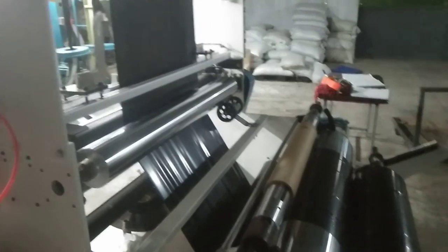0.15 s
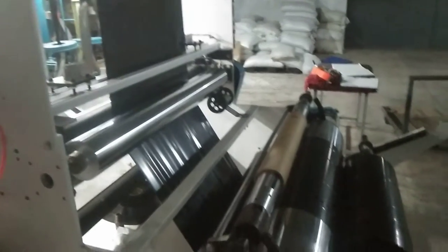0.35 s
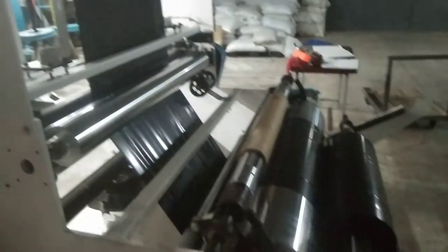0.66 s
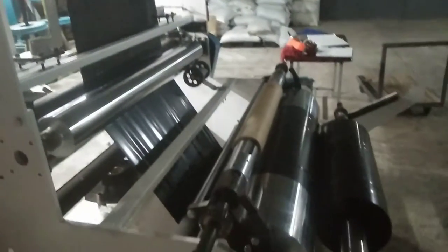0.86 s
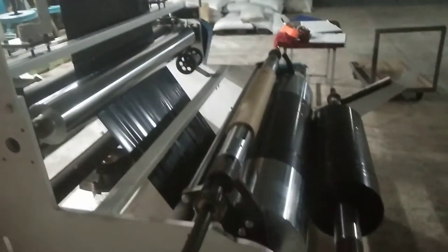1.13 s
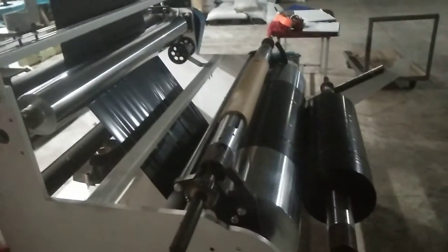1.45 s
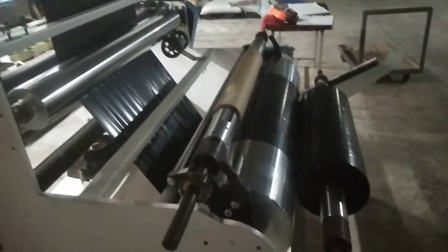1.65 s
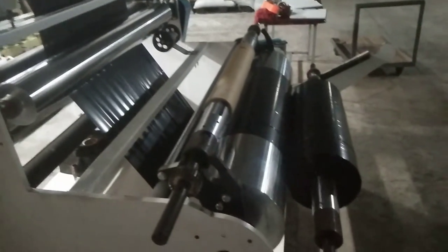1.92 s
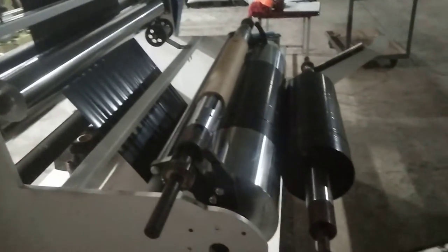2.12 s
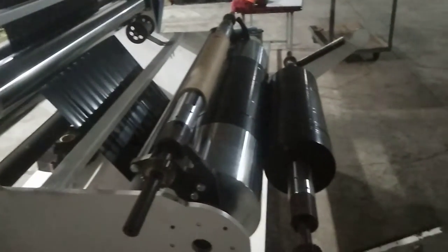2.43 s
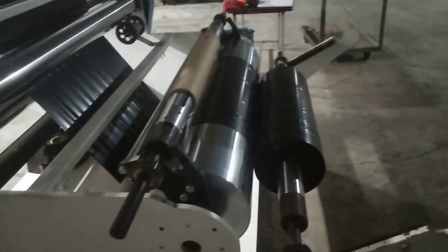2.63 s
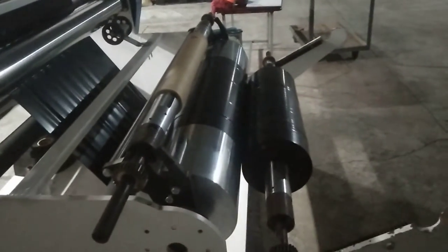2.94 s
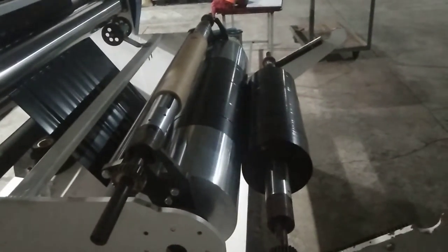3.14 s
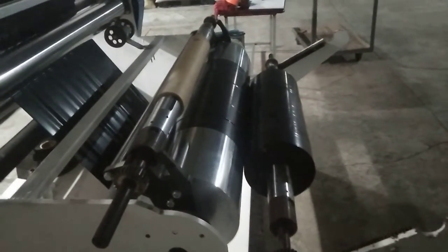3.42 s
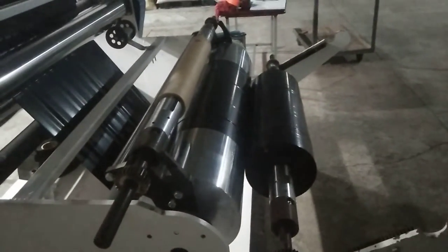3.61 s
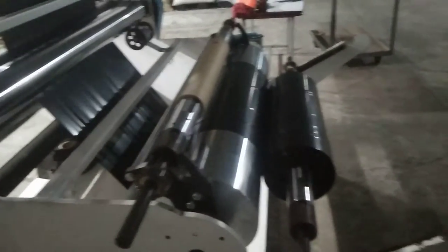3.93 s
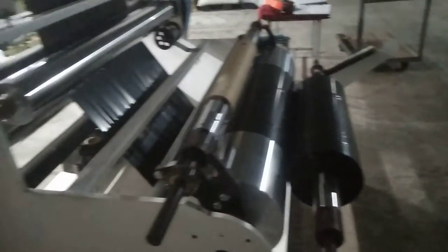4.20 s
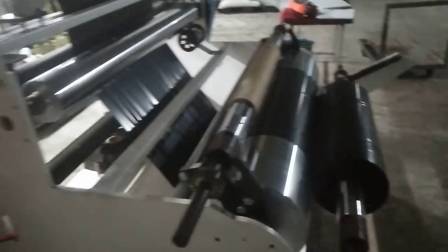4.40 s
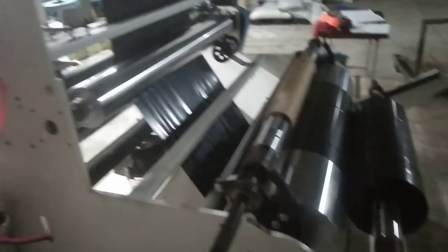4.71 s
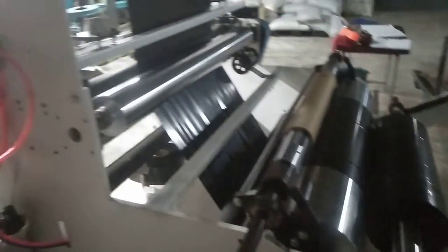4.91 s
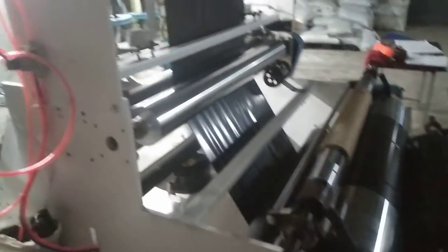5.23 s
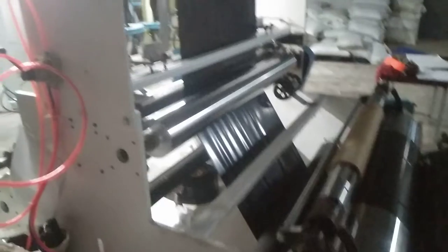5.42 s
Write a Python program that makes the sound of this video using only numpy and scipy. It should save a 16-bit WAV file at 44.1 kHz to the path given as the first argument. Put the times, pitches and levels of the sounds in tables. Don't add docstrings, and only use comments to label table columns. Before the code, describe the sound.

Continuous machine noise from start to finish: a metallic, buzzing high whine dominates, shimmering with hall echoes. Fast regular shaft knocks, about sixteen turns a second, blur into a rough clatter. Behind are gear and fan tones, a thin wavering roller whistle, a fainter distant motor whine, low rumble and broad hiss. Soft low thuds sound far off in the last half second or so. Mono hand-held phone, close to the winder.

```python
import sys
import numpy as np
from scipy import signal
from scipy.fft import rfft, irfft, next_fast_len
from scipy.io import wavfile
from scipy.ndimage import uniform_filter1d

SR = 44100
rng = np.random.default_rng(int(sys.argv[2]) if len(sys.argv) > 2 else 0)


def voltage_ratio(decibels):
    exponent = np.asarray(decibels, float) / 20
    return 10 ** exponent


def put_to_file(sound):
    columns = np.atleast_2d(sound).T
    safe = np.clip(columns, -1, 1)
    whole_steps = np.round(safe * 32767)
    wavfile.write(sys.argv[1], SR, whole_steps.astype(np.int16))


N = 245195
TIME = np.arange(N) / SR

CARRIER_HZ, DRIVE_HZ = 4000.42, 28.975
TURN_HZ = 15.86


def curves(table):
    s, *columns = np.transpose(table)
    return [np.interp(TIME, s, column) for column in columns]


def walk(rate):
    held = np.repeat(rng.standard_normal(int(N / SR * rate) + 2), 8)
    slewed = 1.3 * uniform_filter1d(uniform_filter1d(held, 8), 8)
    return np.interp(TIME * rate * 8, np.arange(len(held)), slewed)


def fading(rate, share):
    share = np.clip(share, 0, 1)
    scattered = walk(rate) + 1j * walk(rate)
    return np.sqrt(1 - share) + np.sqrt(share / 2) * scattered


def tone(hz, db, gain=1, turns=None):
    turns = rng.random() if turns is None else turns
    spin = lambda s: np.exp(2j * np.pi * hz * s)
    rotor = np.outer(spin(TIME[::500]), spin(TIME[:500] + turns / hz)).ravel()[:N]
    return np.sqrt(2) * voltage_ratio(db) * np.imag(gain * rotor)


def noise(points):
    hz, db = np.transpose(points)
    size = next_fast_len(N, True)
    bins = np.arange(size // 2 + 1) * SR / size + 1
    density = voltage_ratio(np.interp(np.log(bins), np.log(hz), db))
    white = rfft(rng.standard_normal(size))
    return irfft(white * density * np.sqrt(SR / 2), size)[:N]


def whine():
    # time_s, sideways_m, forward_m
    hand = [(0.0, 0.1, 0.004), (0.35, 0.085, 0.007), (0.65, 0.077, 0.03), (0.97, 0.101, 0.042),
            (1.3, 0.114, 0.05), (1.7, 0.147, 0.074), (2.0, 0.15, 0.082), (2.35, 0.175, 0.091),
            (2.7, 0.205, 0.114), (3.1, 0.189, 0.134), (3.87, 0.187, 0.13), (4.11, 0.145, 0.167),
            (4.35, 0.068, 0.164), (4.6, 0.083, 0.182), (4.85, 0.07, 0.19), (5.1, 0.002, 0.198),
            (5.3, 0.009, 0.216), (5.56, 0.031, 0.24)]
    # drive_multiple, level_db, echo_lag_turns, sideways_turns_per_m, forward_turns_per_m
    at_carrier = [(-19, -42.2, 0.14, -9.0, -8.2), (-17, -39.1, 0.49, -2.8, -3.3),
                  (-15, -48.2, 0.49, -10.6, 12.4), (-13, -40.7, 0.07, 6.7, 6.4),
                  (-11, -37.1, 0.55, -4.2, -4.0), (-9, -33.4, 0.82, 5.9, 7.3), (-7, -33.4, 0.89, 5.6, 5.6),
                  (-5, -27.5, 0.17, -8.1, 15.7), (-3, -36.7, 0.86, 5.5, -13.0),
                  (-1, -30.3, 0.95, -3.7, -7.2), (1, -30.0, 0.59, -7.0, 0.7), (3, -22.5, 0.52, -0.6, -0.1),
                  (5, -34.8, 0.37, -0.4, 4.7), (7, -42.4, 0.08, 5.9, -6.9), (9, -29.6, 0.1, 6.1, -4.3),
                  (11, -45.8, 0.27, -5.7, -5.8), (13, -40.6, 0.64, -0.6, -1.0),
                  (15, -34.1, 0.34, 0.9, -0.0)]
    slot_above = [(-11, -44.8, 0.2, 9.3, 4.8), (-5, -38.4, 0.33, -3.6, 8.5), (-3, -48.5, 0.65, 3.1, 11.8),
                  (1, -32.6, 0.39, -8.8, 1.0)]
    slot_below = [(-1, -42.6, 0.99, -2.4, 5.6), (3, -45.4, 0.43, -13.1, 9.8), (5, -39.6, 0.58, -14.6, 9.5)]
    at_double = [(-6, -47.6, 0.34, 4.0, 14.5), (-4, -48.4, 0.88, -18.6, 13.6), (0, -47.3, 0.48, -20.1, 6.5),
                 (4, -49.0, 0.99, 2.9, 11.9), (8, -52.1, 0.03, 8.2, 8.9)]
    spread = (.051, -.00317)
    slot_hz, echo_gain = 686.6, .61
    side, forward = curves(hand)
    out = 0
    for base, lines in ((CARRIER_HZ, at_carrier), (CARRIER_HZ + slot_hz, slot_above),
                        (CARRIER_HZ - slot_hz, slot_below), (2 * CARRIER_HZ, at_double)):
        for k, db, lag, per_side, per_forward in lines:
            echo_turns = lag + per_side * side + per_forward * forward
            field = 1 + echo_gain * np.exp(2j * np.pi * echo_turns)
            start_turns = spread[0] * k ** 2 + spread[1] * k ** 3
            out = out + tone(base + k * DRIVE_HZ, db, field * fading(9, .015), start_turns)
    return out * voltage_ratio(-0.08)


def faint_whine():
    # drive_multiple, level_db
    faint_double = [(-12, -55.7), (-10, -55.6), (-2, -50.2), (2, -52.2), (6, -56.1), (10, -56.1)]
    faint_triple = [(-7, -70.0), (-3, -69.3), (-1, -70.0), (1, -69.8), (3, -68.8), (5, -66.5), (7, -70.0),
                    (9, -70.0)]
    # pitch_hz, level_db
    faint_slot = [(3275.7, -44.3), (3334, -43.3), (3343, -50.1), (3392, -46.9), (4425.7, -50.7),
                  (4492.6, -47.7), (4608.8, -48.2), (4782, -53.4), (4890, -50.3), (4939.2, -49.2)]
    lines = [(2 * CARRIER_HZ + k * DRIVE_HZ, db) for k, db in faint_double]
    lines += [(3 * CARRIER_HZ + k * DRIVE_HZ, db) for k, db in faint_triple]
    return voltage_ratio(.4) * sum(tone(hz, db, fading(3.5, .3)) for hz, db in lines + faint_slot)


def clatter():
    # pitch_hz, width_hz, level_db
    housing = [(193, 18, -44.5), (244.5, 16, -44), (303.4, 30.3, -39), (396, 104, -45), (525, 27.5, -46.5),
               (632, 60, -43.5), (691.4, 12, -45), (746, 51, -44.5), (1006, 21.6, -42.5)]
    multiples = np.arange(11, 66)
    power = 0
    for hz, width, db in housing:
        power = power + voltage_ratio(db) ** 2 / (1 + (2 * (multiples * TURN_HZ - hz) / width) ** 4)
    uneven_db = 0.95 * rng.standard_normal(len(multiples))
    size = np.sqrt(power) * voltage_ratio(uneven_db)
    return sum(a * tone(k * TURN_HZ, 0, fading(k / 6, k / 130)) for k, a in zip(multiples, size))


def rattles():
    # place_in_turn (0-1), level_db
    knocks = [
        (.23, 1),
        (0.472, 5.5),
        (.74, -8),
        (.97, 1.5),
    ]
    blows = np.zeros(N + SR)
    for place, db in knocks:
        chance = rng.standard_normal((int(N / SR * TURN_HZ) + 1, 2))
        at_s = (np.arange(len(chance)) + place) / TURN_HZ + 0.0009 * chance[:, 0]
        blows[(at_s * SR).astype(int)] += voltage_ratio(db + 2.5 * chance[:, 1])
    ring = signal.lfilter([1], [1, -np.exp(-1 / (0.007 * SR))], blows[:N])
    ring = ring * voltage_ratio(2.5 * walk(14))
    # pitch_hz, density_db_per_hz; a thin part rings along near the top
    bright = [(2500, -100), (5000, -74.5), (8500, -76), (10000, -77.5), (10600, -101), (15600, -101)]
    thin = [(9500, -110), (9750, -78), (9950, -96), (10100, -110)]
    return ring * (noise(bright) + noise(thin))


def gears():
    # pitch_hz, level_db
    machine_tones = [(61.2, -53.7), (161.6, -33.2), (173.6, -41.4), (307.5, -44.2), (385.6, -44.6),
                         (582.7, -46.6), (604.3, -40.5), (786.6, -46.1), (959.6, -52.7), (975.1, -49.4),
                         (1395.6, -47.1), (1536.9, -46.3), (1693, -49.6), (1895.6, -48.6), (1919.1, -45.4),
                     (2000.6, -44.6), (2018, -43.7), (2080.6, -46.1), (2152, -45.4), (2308.1, -50.0),
                     (2709.1, -51.3), (2748.2, -48.7), (2787.2, -53.3)]
    return sum(tone(hz, db, fading(8, min(.02 + hz / 4000, .4))) for hz, db in machine_tones)


def roller():
    # time_s, pitch_hz, level_db
    whistle = [(0, 1983, -44), (.5, 1983, -40), (1.4, 1983, -40), (2.2, 1981, -38), (2.7, 1980, -35),
               (3.3, 1979, -39), (3.8, 1983, -40), (4.2, 1986, -35), (4.9, 1988, -36), (5.56, 1983, -38)]
    hz, db = curves(whistle)
    rotor = np.exp(2j * np.pi * np.cumsum(hz) / SR)
    return np.sqrt(2) * voltage_ratio(db) * np.imag(fading(24, .25) * rotor)


def far_motor():
    # pitch_hz, level_db
    far_drive = [(5330.8, -46.9), (5460.9, -53.7), (5935.4, -45.0), (6021.9, -53.7), (6065.6, -48.5),
                 (6540.1, -52.7), (6670, -56.3), (7140.3, -55.4), (7371.8, -52.2), (7486.8, -54.9),
                 (8455.3, -47.6), (11285.4, -68.3), (12484.5, -70.0), (12715.6, -70.0)]
    # time_s, level_db
    far_reach = [
        (0, 2.5),
        (.9, 0),
        (2.3, -1.5),
        (3.5, 3.5),
        (4.5, -1),
        (5.56, -1),
    ]
    reach_db, = curves(far_reach)
    return voltage_ratio(reach_db) * sum(tone(hz, db, fading(3.5, .15)) for hz, db in far_drive)


def thuds():
    # centre_s, pitch_hz, glide_hz_per_s, length_s, level_db
    swells = [
        (5.0, 128, -2, 0.044, -33.5),
        (5.49, 133, 148, 0.04, -28),
    ]
    out = 0
    for s, hz, glide, length, db in swells:
        since = TIME - s
        swell = np.exp(-.5 * (since / length) ** 2)
        out = out + np.sqrt(2) * voltage_ratio(db) * swell * np.sin(2 * np.pi * (hz + glide * since / 2) * since)
    return out


def air():
    # pitch_hz, density_db_per_hz
    rumble = [(20, -71), (45, -83), (62, -64), (80, -66), (125, -53), (170, -52.5), (230, -56), (330, -57),
              (480, -57), (650, -61), (860, -59), (1000, -59), (1250, -60), (1700, -61.5)]
    hiss = [(1700, -61.8), (2000, -60), (2400, -62.5), (3050, -64), (3900, -59), (4600, -63), (5100, -67),
            (6800, -71), (7800, -67), (8350, -69.5), (8800, -68.5), (9900, -78.5), (10500, -85.5),
            (12000, -86)]
    top = [(12500, -89), (13000, -92), (14900, -96), (15300, -96), (15700, -96)]
    # time_s, gain_db
    gain = [
        (0, 0),
        (.45, 0.5),
        (.85, -2.7),
        (2.4, 0),
        (2.75, -0.9),
        (4.8, 0),
        (5.2, 0.5),
        (5.56, 0.8),
    ]
    gain_db, = curves(gain)
    hz, db = np.transpose(rumble + hiss[1:] + top)
    slope = np.log10(np.cos(np.linspace(-1, 1, 33) * np.pi / 2) ** 2 + 1e-9) * 10
    out = 0
    for centre in 20 * 2. ** np.arange(0, 10.5, .5):
        edges = centre * 2. ** np.linspace(-.5, .5, 33)
        band = noise(np.c_[edges, np.interp(np.log(edges), np.log(hz), db) + slope])
        swell_db = gain_db if centre < 1600 else 0.66 * gain_db
        out = out + band * voltage_ratio(swell_db + 0.5 * walk(5.96))
    return out


def scene():
    motor = whine() + faint_whine()
    shaft = clatter() + rattles()
    hall = gears() + roller() + far_motor() + thuds() + air()
    return (motor + shaft + hall)[None]


def low_pass(x):
    return signal.sosfilt(signal.butter(12, 15660, fs=SR, output="sos"), x)


def record(dry):
    mix = np.tanh(0.83 * dry) / 0.77
    return low_pass(mix)


dry = scene()
out = record(dry)
put_to_file(out)
```